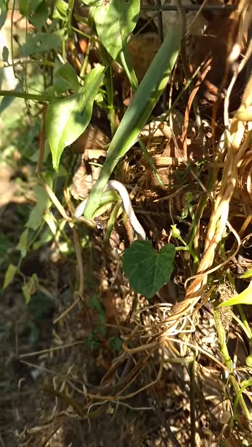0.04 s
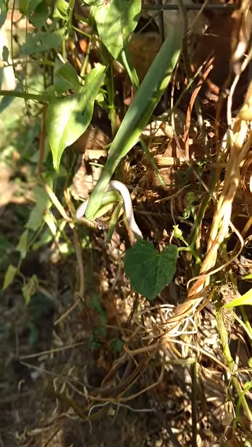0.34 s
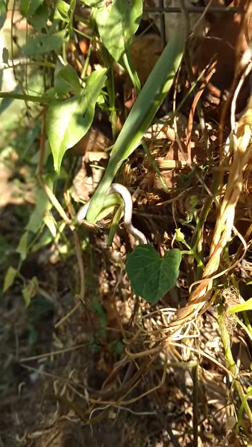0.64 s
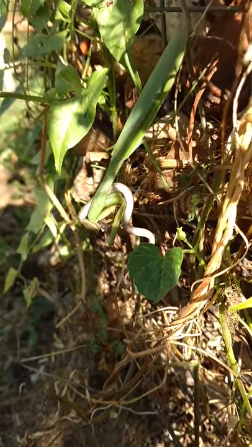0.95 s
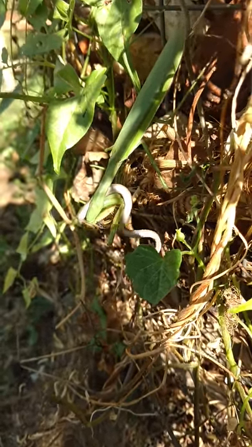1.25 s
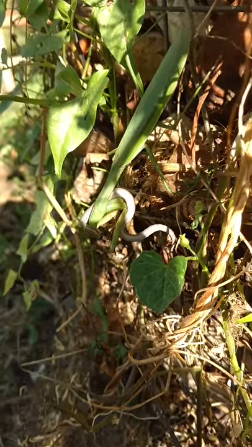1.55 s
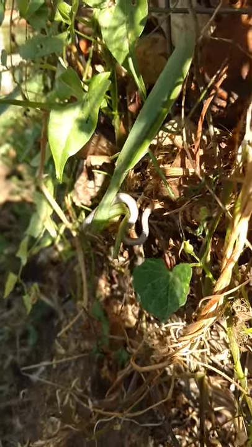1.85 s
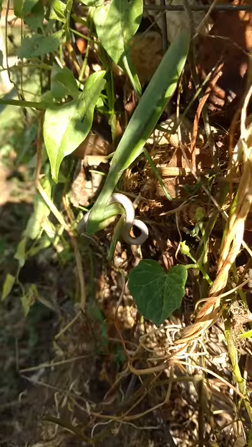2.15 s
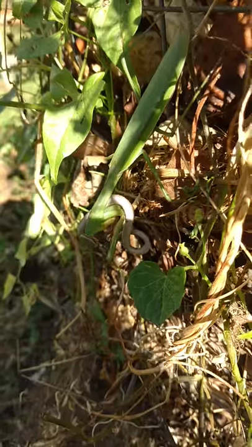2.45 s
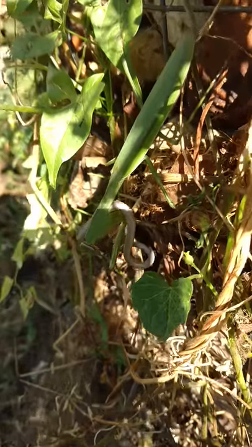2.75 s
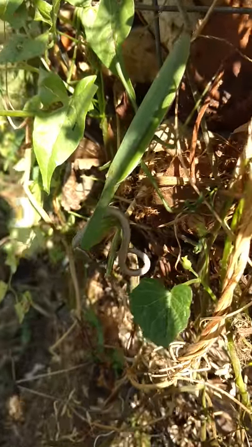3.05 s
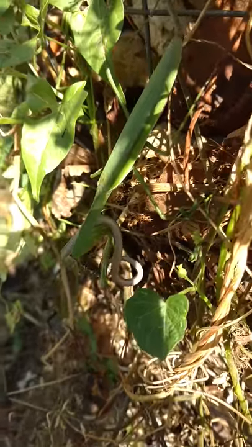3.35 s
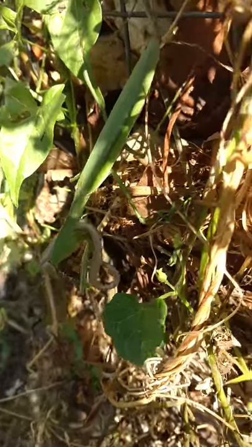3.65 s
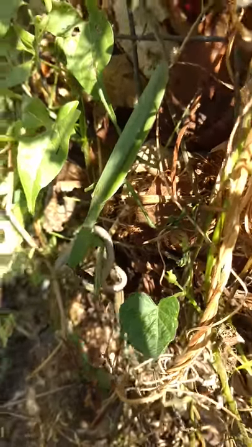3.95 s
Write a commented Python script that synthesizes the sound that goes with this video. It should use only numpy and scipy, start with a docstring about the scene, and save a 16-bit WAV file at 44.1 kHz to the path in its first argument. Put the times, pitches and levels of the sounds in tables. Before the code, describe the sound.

Two small birds scold with harsh rattles and pure trills while dry leaves snap nearby.

```python
"""A garden corner: two small birds scold, one in harsh rattles, the other in pure, swelling trills,
both made of quick falling notes. Dry leaves and stalks snap close by, and insects give a few very
high ticks and a thin whine. Behind them a distant road slowly grows louder, foliage hisses and a
far motor hums. Air rumbles on the hand-held microphone and fingers knock softly on its case."""
import sys
import numpy as np
from scipy import signal
from scipy.fft import rfft, irfft
from scipy.io import wavfile
from scipy.ndimage import uniform_filter1d

SR = 44100
rng = np.random.default_rng(int(sys.argv[2]) if len(sys.argv) > 2 else 0)


def master(y):
    """Save y as 16-bit WAV."""
    cut = np.clip(np.atleast_2d(y).T, -1, 1)
    pcm = np.round(cut * 32767)  # scale
    wavfile.write(sys.argv[1], SR, pcm.astype(np.int16))


N = 176400


def undb(db):
    """Decibels to gain."""
    return 10 ** (np.asarray(db) / 20)


def unit(x):
    """Scale to rms 1."""
    return x / np.sqrt(np.mean(x ** 2) + 1e-20)


def noise():
    """Two unrelated white noises."""
    return rng.standard_normal((2, N))


def curve(rows):
    """A fader ride: gain over time through points of seconds and dB."""
    return undb(np.interp(np.arange(N) / SR, *np.array(rows).T))


def pan(db):
    """Stereo gains that put the left side db above the right."""
    return unit(undb(np.array([[db], [-db]]) / 2))


def colour(x, points):
    """EQ through points of Hz and relative dB, keeping the power of white noise."""
    hz, db = np.array(points).T
    f = np.arange(N // 2 + 1) * SR / N
    gain = unit(undb(np.interp(np.log(f + 1), np.log(hz), db)))
    return irfft(rfft(x) * gain, N)


def walk(rate_hz):
    """Smooth random drift with spread 1."""
    hold = max(int(SR / rate_hz), 1)
    steps = np.repeat(rng.standard_normal(N // hold + 1), hold)
    return unit(uniform_filter1d(steps, hold)[:N])


def add(out, x, start_s):
    """Mix a short sound in at a time."""
    i = max(int(start_s * SR), 0)
    n = max(min(x.shape[-1], N - i), 0)
    out[..., i:i + n] += x[..., :n]


def ring(hz, width_hz, t):
    """A scraped resonance: a tone whose strength and phase scatter over its width."""
    k = max(int(SR / width_hz), 2)
    scatter = uniform_filter1d(rng.standard_normal((2, len(t))), k) * np.sqrt(k)
    return scatter[0] * np.cos(2 * np.pi * hz * t) + scatter[1] * np.sin(2 * np.pi * hz * t)


def ports(pair):
    """Diffuse sound on two microphone ports: alike in the bass, in and out of phase up the treble."""
    corner_hz, lag_s = 1280, 0.0003875
    f = np.arange(N // 2 + 1) * SR / N
    likeness = np.where(f < corner_hz, 1 - 0.16 * (1 - f / corner_hz), -np.cos(2 * np.pi * f * lag_s))
    likeness *= np.interp(f, [1500, 2500], [.99, .92])
    mid, side = irfft(rfft(pair) * np.sqrt([(1 + likeness) / 2, (1 - likeness) / 2]), N)
    return np.array([mid + side, mid - side])


def garden_echo(x):
    """Add a short tail of echoes scattered by walls and foliage."""
    wet_db, t60_s = -14, 0.2
    t = np.arange(SR // 2) / SR
    tails = rng.standard_normal((2, len(t))) * np.exp(-np.log(1000) * t / t60_s)
    wet = signal.fftconvolve(x.mean(0)[None], tails / np.linalg.norm(tails[0]))[:, :N]
    return x + undb(wet_db) * ports(wet)


def road():
    """Distant traffic: a dull, diffuse wash that slowly builds."""
    # Each row: frequency in Hz, relative level in dB.
    spectrum = [(30, -37), (80, -1.5), (150, 3), (280, -2), (400, -2.5), (700, -2.5), (1200, -2.5),
                (1600, -9), (2200, -14.5), (3200, -16), (5000, -29), (8000, -34), (15000, -54)]
    # Each row: time in seconds, level in dB.
    fader = [(0, -41), (.8, -40.5), (1.35, -39.5), (1.8, -39.5), (2.4, -38), (3.3, -37.5), (3.65, -36.5),
             (3.85, -33), (4, -35)]
    return ports(colour(noise(), spectrum)) * curve(fader) * undb(0.5 * walk(7.08)) * pan(-0.67)


def air_rumble():
    """Moving air rumbles on each microphone port separately."""
    # Each row: frequency in Hz, relative level in dB.
    spectrum = [(20, -43), (35, -19), (55, -7), (85, -5.5), (125, -2), (180, 0.5), (250, -4), (400, -11.5),
                (700, -21), (1300, -36), (3000, -62), (15000, -79)]
    # Each row: time in seconds, level in dB.
    fader = [(0, -40), (.8, -41), (1.12, -42), (1.27, -38), (1.45, -44), (1.75, -43), (2.1, -41),
             (2.4, -42), (3.3, -41.5), (3.55, -43), (4, -42.5)]
    return colour(noise(), spectrum) * curve(fader) * pan(4.5)


def foliage_hiss():
    """Foliage gives a faint, diffuse hiss that lifts near the end."""
    # Each row: frequency in Hz, relative level in dB.
    spectrum = [(1500, -14.5), (3500, 2.5), (5000, 1), (7000, -4), (10000, -7), (12500, -12.5),
                (15000, -18)]
    # Each row: time in seconds, level in dB.
    fader = [(0, -59), (2.5, -57), (3.3, -56.5), (4, -48.5)]
    return ports(colour(noise(), spectrum)) * curve(fader) * undb(.5 * walk(12)) * pan(0.34)


def motor():
    """A far motor on the left: fluttering harmonics of its drifting speed over a soft whirr."""
    # Each row: multiple of the turning rate, level in dB before the fader.
    harmonics = [(3, -56.5), (4, -55.5), (5, -51), (9, -59)]
    # Each row: time in seconds, gain on the hum in dB.
    hum_fader = [(0, -0.5), (1.6, 1), (2, 5.5), (2.45, -4), (3, 2.5), (3.5, 6), (4, 5)]
    # Each row: time in seconds, gain on the whirr in dB.
    whirr_fader = [(0, -5), (.4, 2), (1.05, 1.5), (1.25, 5), (1.5, -6), (1.8, 2), (2.8, 3), (4, 6)]
    # Each row: frequency in Hz, relative level in dB.
    whirr_eq = [(60, -30), (160, -1.5), (300, -2), (420, -6), (700, -13.5), (2000, -39), (8000, -73)]
    turn_hz, drift, flutter_hz = 59.2, .006, 18
    turn = 2 * np.pi * np.cumsum(turn_hz * (1 + drift * walk(4))) / SR
    hum = np.zeros(N)
    for multiple, db in harmonics:
        flutter = 1 + 0.5 * (walk(flutter_hz) + 1j * walk(flutter_hz))  # in level and phase
        hum += undb(db) * unit(np.real(flutter * np.exp(1j * multiple * turn)))
    whirr = undb(-46.5) * colour(noise(), whirr_eq)
    return (hum * curve(hum_fader) + whirr * curve(whirr_fader)) * pan(12)


def air_puffs():
    """Soft puffs of air hit the microphone as brief low swells, unrelated on the two ports."""
    # Each row: peak time in seconds, half-width in seconds, level in dB.
    puffs = [(.8, 0.18, -43), (2.064, 0.11, -38), (3.584, 0.13, -43)]
    # Each row: frequency in Hz, relative level in dB.
    spectrum = [(30, -34), (70, -4), (125, 16), (200, -16), (600, -22), (3000, -70)]
    t = np.arange(N) / SR
    swells = sum(undb(db) * np.exp(-((t - s) / width) ** 2) for s, width, db in puffs)
    return colour(noise(), spectrum) * swells


def finger_knocks():
    """Dull knocks through the microphone's case push its two ports in opposite directions."""
    # Each row: time in seconds, level in dB, left minus right in dB.
    knocks = [(0.617, -29.5, -30), (2.2, -22, -6), (2.646, -28, -7), (2.73, -26, -9), (2.863, -20, 6.5),
              (2.963, -22, 2), (3.162, -28, 0), (3.514, -19, -1), (3.607, -25, -13), (3.871, -22, 3.5)]
    thud_hz, half_width_s = 130, 0.0052
    out, t = np.zeros((2, N)), np.arange(-SR // 50, SR // 50) / SR
    thud = np.cos(2 * np.pi * thud_hz * t) * np.exp(-(t / half_width_s) ** 2)
    for s, db, side_db in knocks:
        add(out, undb(db) * thud * pan(side_db) * np.array([[-1], [1]]), s + t[0])
    return out


def insect_whine():
    """A flying insect's thin tone wanders in pitch and flickers in level."""
    # Each row: time in seconds, pitch in Hz, level in dB.
    flight = [(.5, 6070, -82), (.66, 6060, -63), (.78, 6020, -66), (.89, 5950, -75), (1.08, 5860, -72),
              (1.17, 5950, -71), (1.23, 5980, -62), (1.28, 6030, -66), (1.48, 6030, -63), (1.56, 6000, -84)]
    times, pitch, level_db = np.array(flight).T
    hz = np.interp(np.arange(N) / SR, times, pitch) * (1 + .002 * walk(300))
    tone = unit(np.sin(2 * np.pi * np.cumsum(hz) / SR))
    return tone * curve(np.c_[times, level_db]) * undb(2 * walk(22))


def insect_ticks():
    """An insect on the left ticks: a very high scrape, then a lower one, in a little burst of rasp."""
    # Each row: time in seconds, level in dB, pitch of the lower scrape in Hz.
    ticks = [(1.057, -39, 11900), (1.147, -39, 11600), (3.5575, -43, 13600), (3.6492, -43, 13400)]
    # Each row: frequency in Hz, relative level in dB.
    rasp_eq = [(4000, -3), (10000, -15), (11500, -3), (14500, -3), (16000, -1)]
    lead_hz, lead_s, width_hz, decay_s = 14700, 0.0016, 820, 0.001
    scrapes, rasp_env = np.zeros(N), np.zeros(N)
    t = np.arange(-SR // 50, SR // 50) / SR
    env = np.exp(-np.abs(t) / decay_s)
    for s, db, hz in ticks:
        add(scrapes, undb(db) * env * ring(lead_hz, width_hz, t), s + t[0] - lead_s)
        add(scrapes, undb(db) * env * ring(hz, width_hz, t), s + t[0])
        add(rasp_env, undb(db - 2) * env ** .5, s + t[0])
    rasp = colour(rasp_env * rng.standard_normal(N), rasp_eq)
    return (scrapes + rasp) * pan(7.9)


def dry_leaves():
    """Dry stalks snap, splinter, ring and trail a rustle; fine crackle builds as undergrowth stirs."""
    # Each row: start in seconds, relative level in dB, pitch of the stalk in Hz.
    snaps = [(2.168, -47, 11000), (2.414, -52, 9000), (2.696, -37, 6940), (2.705, -34, 7100),
             (2.71, -39, 10500), (2.719, -38.5, 6840), (2.724, -29, 8800), (2.911, -35, 9000),
             (2.973, -47, 10900), (3.008, -40, 8400), (3.062, -43, 9100), (3.132, -40, 9400),
             (3.1352, -35, 8500), (3.174, -38, 9500), (3.184, -59, 9500), (3.292, -53, 8900),
             (3.363, -40, 9150), (3.383, -36, 7000), (3.407, -47, 9000), (3.493, -33.5, 8840),
             (3.539, -44, 8950), (3.611, -33.5, 8650), (3.659, -44, 9000), (3.734, -45, 9000),
             (3.810, -34.5, 8500), (3.832, -33, 9200), (3.835, -31.5, 6800), (3.881, -46, 9500),
             (3.912, -49, 9000), (3.964, -38, 8700)]
    # Each row: frequency in Hz, relative level in dB.
    leaf_eq = [(1500, -18), (3500, 0), (5000, -2.5), (7000, -0.5), (9200, -3.5), (11000, -9.5),
               (15000, -19)]
    snap_s, rustle_s, splinter_s, grain_s = 0.0016, 0.019, 0.0052, 0.00057  # decay times
    rustle_db, splinter_db, stalk_db = -25, -8.5, -8.5  # against the snap
    splinters_per_s, crackles_per_s = 700, 280
    t = np.arange(SR // 10) / SR
    burst = np.exp(-t / snap_s) + undb(rustle_db) * np.exp(-t / rustle_s)
    grain = np.exp(-t / grain_s)
    snap_env, stalks = np.zeros(N), np.zeros((2, N))
    for s, db, hz in snaps:
        cracks = (rng.random(len(t)) < splinters_per_s / SR) * np.exp(-t / splinter_s)
        splinters = signal.fftconvolve(cracks, grain)[:len(t)]
        env = np.hypot(burst, undb(splinter_db) * splinters) * undb(db - 2)
        ringing = np.array([ring(hz, width_hz=900, t=t) for _ in range(2)])
        add(snap_env, env, s)
        add(stalks, undb(stalk_db) * env * ringing, s)
    crackles = (rng.random(N) < crackles_per_s / SR) * undb(3.2 * np.minimum(rng.exponential(size=N), 3))
    stir = np.interp(np.arange(N) / SR, [2.6, 4.4], [.12, 1])
    crackle_env = undb(-54.5) * stir * unit(signal.fftconvolve(crackles, grain)[:N])
    crunch = colour((snap_env + crackle_env) * noise(), leaf_eq)
    return ports(crunch + stalks) * pan(0.49)


def bird_note(hz, length_s, fall, wobble, scoop=0):
    """Phase and envelope of a falling note; fall, wobble and the scoop from above are shares of hz."""
    u = np.linspace(0, 1, max(int(length_s * SR), 64))
    shake = unit(uniform_filter1d(rng.standard_normal(2048), size=30))[:len(u)]
    pitch = hz * (1 + fall * (.5 - u) + scoop * np.exp(-u / 0.157) + wobble * shake)
    return 2 * np.pi * np.cumsum(pitch) / SR, np.abs(np.sin(np.pi * u)) ** 0.91


def trilling_bird():
    """Evenly spaced pure falling notes that swell and edge up in pitch through each trill."""
    # Each row: first and last note in seconds, note count, final level in dB,
    # shape of the swell (under 1 it comes late, over 1 early).
    trills = [(0.746, 0.788, 3, -52.5, 2.2), (1.035, 1.08, 3, -50, .8), (1.315, 1.427, 6, -45.5, 2),
              (1.625, 1.739, 6, -40.5, 1.8), (1.978, 2.092, 6, -40, 2.7), (2.344, 2.478, 7, -40, 3.8),
              (2.701, 2.815, 6, -39.5, 2), (3.308, 3.374, 4, -45.5, 0.35), (3.530, 3.609, 5, -45, 2.3),
              (3.774, 3.852, 5, -38, 2)]
    pitch_hz, note_s, swell_db = 3522, .017, 11.5
    out = np.zeros(N)
    for first, last, count, final_db, early in trills:
        for u in np.linspace(0, 1, count):
            hz = pitch_hz * (1 - 0.051 * (1 - u) ** 2)
            phase, env = bird_note(hz, note_s, fall=0.22, wobble=0.018)
            db = final_db - swell_db * (1 - u) ** early + 0.67 * rng.standard_normal()
            start_s = first + (last - first) * u - note_s / 2
            add(out, np.sqrt(2) * undb(db) * env * np.sin(phase), start_s)
    return out * pan(-.3)


def rattle_notes():
    """The nearer bird's phrasing: lone chips, and rattles whose notes slow, lengthen and grow hoarse."""
    # Each row: time in seconds, relative level in dB.
    chips = [(.993, -44.5), (1.098, -43.5), (3.494, -43)]
    # Each row: first and last note in seconds, note count, slowing from 0 to 1, first and last
    # relative level in dB, mid-rattle swell in dB, brightness in dB, hoarseness from 0 to 1.
    rattles = [(0.226, .503, 18, .15, -40.5, -45, .5, -0.5, 0.93),
               (1.180, 1.486, 18, 0.08, -43, -41, 0, 1, 0.62),
               (2.265, 2.526, 17, 0.21, -40, -43.5, 1, 3.5, 0.77),
               (2.886, 3.134, 16, .19, -40, -44, 0, 5, 0.81), (3.674, 3.997, 19, .1, -44, -41, 0, 7, 0.47)]
    first_note_s, full_note_s, growth_s = 0.0062, .0135, .05
    notes = [(s, db, full_note_s, 0, .4) for s, db in chips]
    for first, last, count, slowing, first_db, last_db, swell_db, bright_db, hoarse in rattles:
        for u in np.linspace(0, 1, count):
            age = (last - first) * (u - slowing * u * (1 - u))
            length = full_note_s + (first_note_s - full_note_s) * np.exp(-age / growth_s)
            db = first_db + (last_db - first_db) * u + swell_db * np.sin(np.pi * u)
            notes.append((first + age, db, length, bright_db, hoarse * (0.34 + 0.89 * u)))
    return notes


def rattling_bird():
    """Harsh notes whose overtones flash at each peak; hoarseness adds wobble, growl and noisy rasp."""
    # Each row: multiple of the pitch, relative level in dB, left minus right in dB,
    # exponent on the note's envelope.
    partials = [(1, -1.6, -23.5, .9), (2, -7, 4, 2), (3, -33, 12, 2)]
    # The throat's resonances. Each row: frequency in Hz, relative gain in dB.
    throat_eq = [(2500, -11), (3130, 0), (3600, 0), (4700, -9), (5500, -12), (6000, -6), (6350, -1),
                 (6750, -10), (7300, -14), (9500, -1), (15000, -8)]
    # Each row: frequency in Hz, relative level in dB.
    rasp_eq = [(2000, -26), (3200, 17), (4700, -11), (6400, 4), (8000, -1), (10000, -7), (12000, -4),
               (15000, -11)]
    pitch_hz, rasp_blur_s = 3147, 0.01
    voice, rasp_env = np.zeros((2, N)), np.zeros(N)
    for s, db, length, bright_db, hoarse in rattle_notes():
        hz = pitch_hz * (1 + 0.0076 * rng.standard_normal())
        phase, env = bird_note(hz, length, fall=0.068, wobble=0.053 * hoarse, scoop=0.176 * hoarse)
        gain = np.sqrt(2) * undb(db + 0.96 * rng.standard_normal())
        tone = 0
        for multiple, partial_db, side_db, power in partials:
            tilt_db = bright_db * (.5 if multiple > 1 else -.5)
            tone += pan(side_db) * undb(partial_db + tilt_db) * env ** power * np.sin(multiple * phase)
        # The growl sits halfway between the harmonics, in opposite polarity left and right.
        growl = (np.sin(1.5 * phase) + .4 * np.sin(2.5 * phase)) * np.array([[1], [-1]])
        add(voice, gain * (tone + undb(-3) * hoarse * env * growl), s - length / 2)
        add(rasp_env, gain * env ** 2 * hoarse, s - length / 2)
    rasp_env = uniform_filter1d(rasp_env, int(rasp_blur_s * SR))
    rasp = ports(undb(-7) * rasp_env * colour(noise(), rasp_eq))
    return undb(-5) * colour(voice, throat_eq) + rasp


def scene():
    """The birds and their echoes, with the small close sounds, over the background."""
    birds = garden_echo(rattling_bird() + trilling_bird())
    close = insect_ticks() + insect_whine() + dry_leaves() + finger_knocks() + air_puffs()
    background = motor() + road() + air_rumble() + foliage_hiss()
    return birds + close + background


def record(dry):
    """A steep low-pass takes off the very top."""
    cutoff_hz = 15400
    return signal.sosfilt(signal.ellip(8, .2, 80, cutoff_hz, fs=SR, output="sos"), dry)


dry = scene()
out = record(dry)
master(out)
```